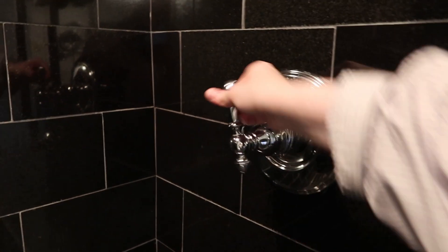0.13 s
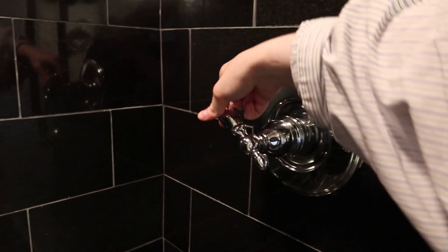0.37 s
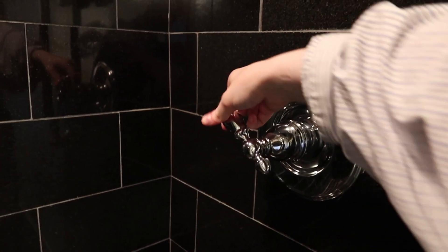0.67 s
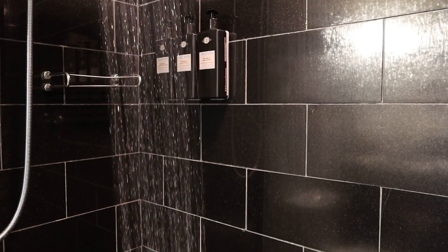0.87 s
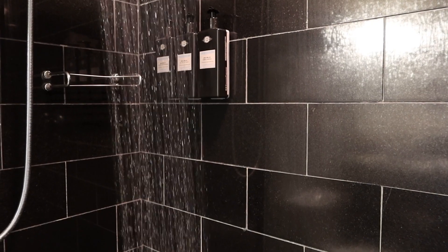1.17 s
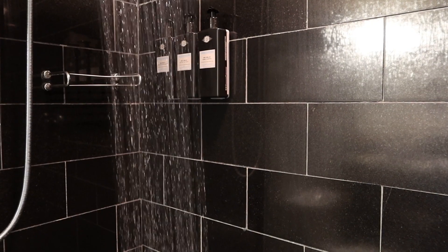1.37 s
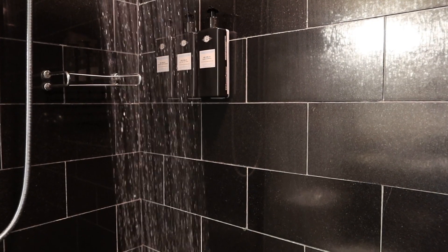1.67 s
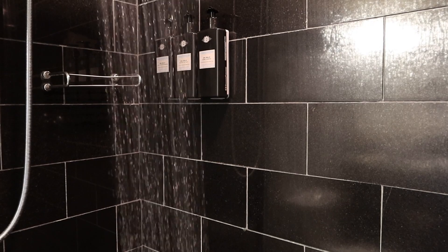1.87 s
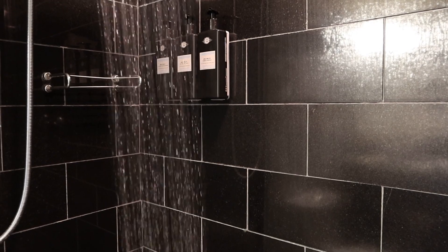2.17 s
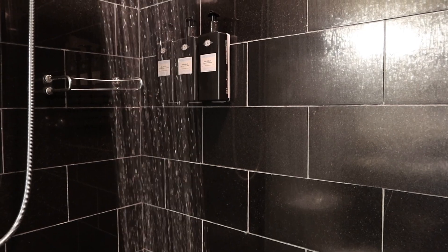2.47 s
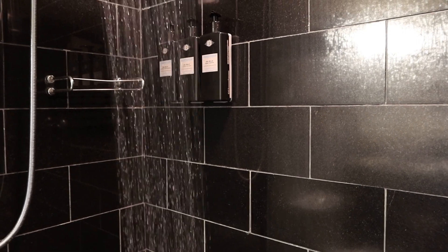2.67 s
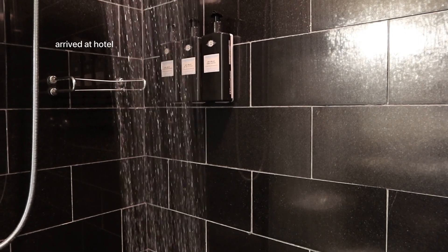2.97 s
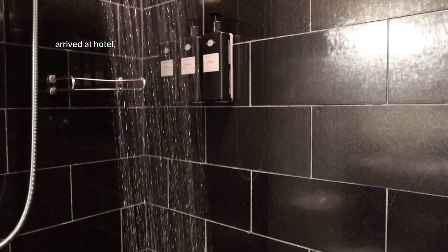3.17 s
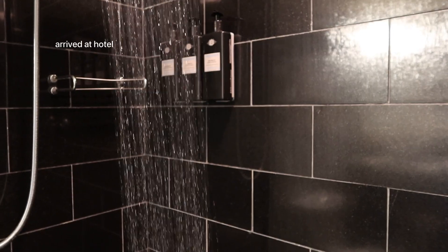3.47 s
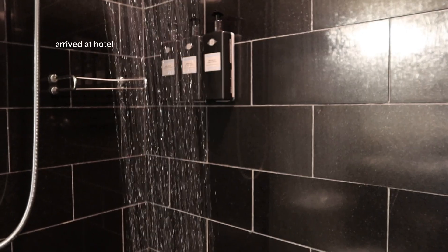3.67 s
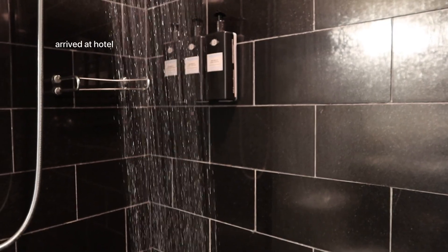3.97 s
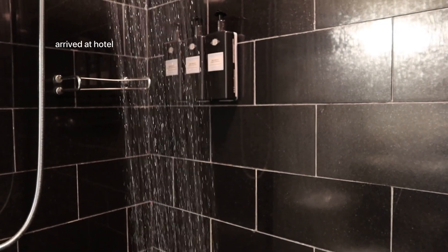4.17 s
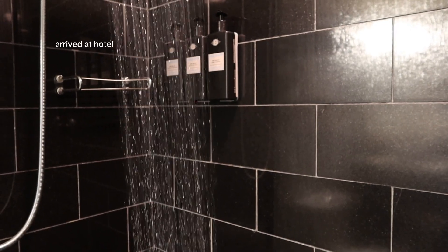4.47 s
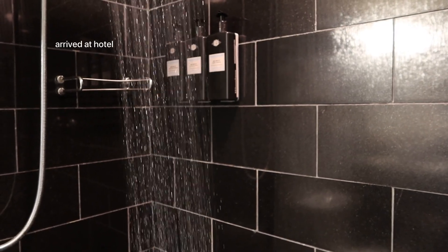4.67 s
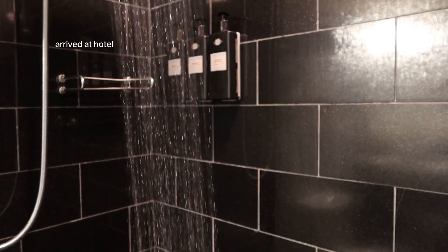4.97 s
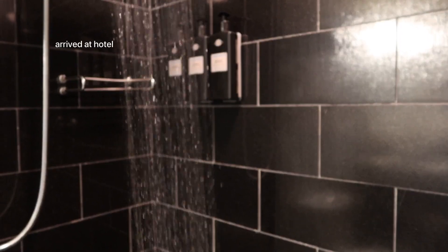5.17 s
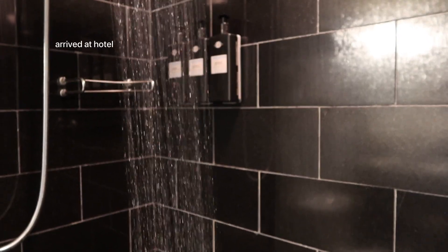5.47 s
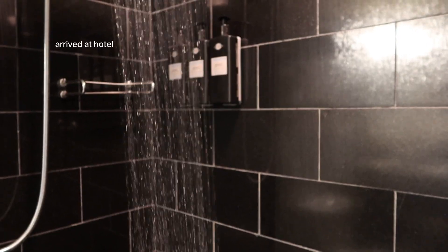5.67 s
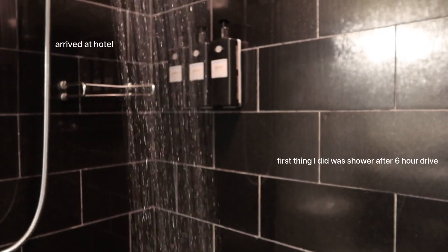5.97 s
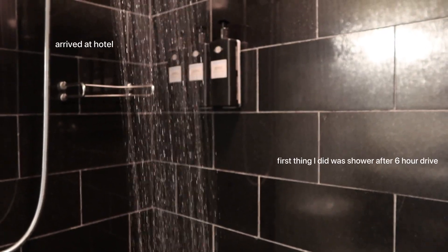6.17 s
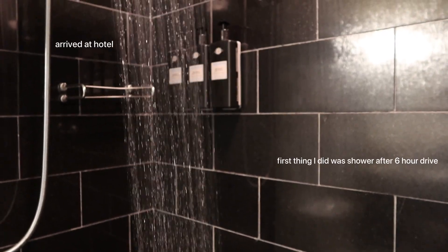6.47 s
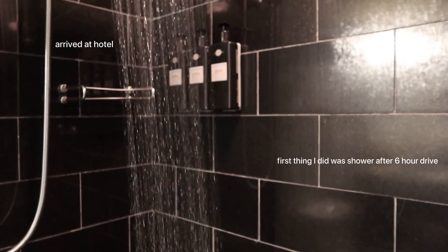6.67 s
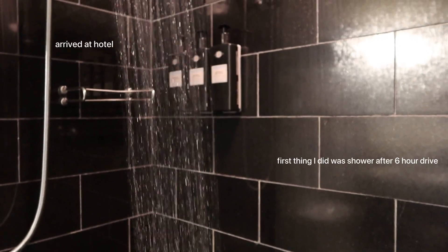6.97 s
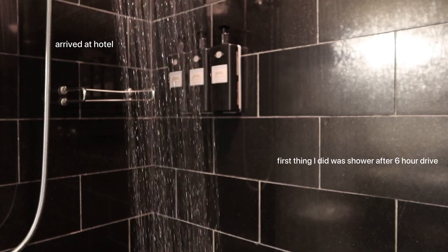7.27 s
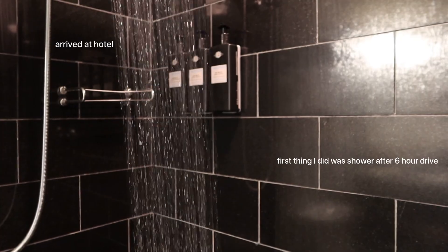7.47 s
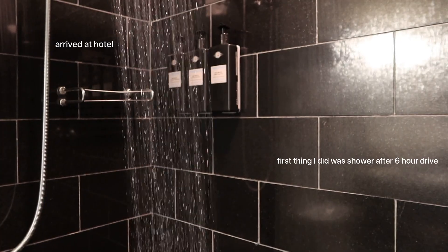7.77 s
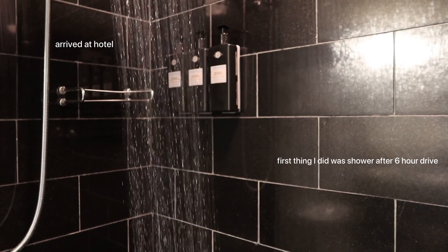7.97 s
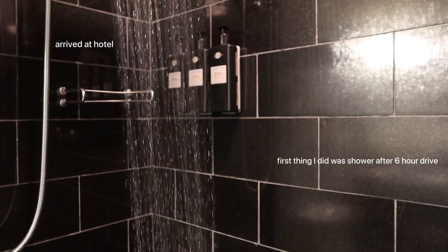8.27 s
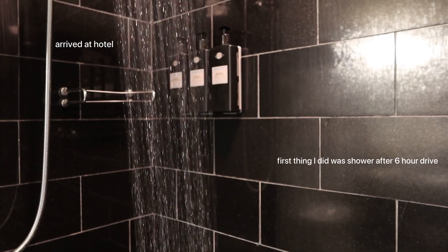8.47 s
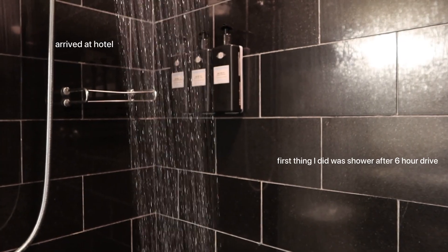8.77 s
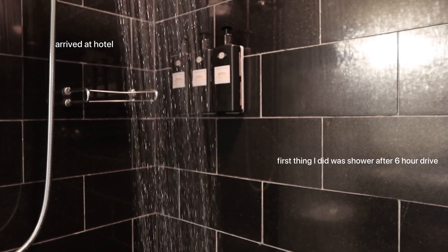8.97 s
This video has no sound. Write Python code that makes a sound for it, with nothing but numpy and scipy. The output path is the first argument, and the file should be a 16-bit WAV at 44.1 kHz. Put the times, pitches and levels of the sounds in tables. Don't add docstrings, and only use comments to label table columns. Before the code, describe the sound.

From 0 to about 0.7 s, a shower valve opens close by: a weak flow quickly swells into a pressurised rush, its jet hiss tightest around 0.2 s, with a faint fuzzy whistle near 3.7 kHz and watery pipe gurgle growing as the flow strengthens. At 0.72 s it changes abruptly to an overhead shower in a tiled stall, fading in almost instantly and running steadily to a sudden stop near 9.1 s. The spray is dense, grainy and bright, with a resonant midrange body and slight flicker. Irregular clumps slap and splash, notably around 1.9, 2.7, 4.7, 6.2 and 7.9 s; tiny drops ring briefly, and hollow plops land around 1.1, 4.1, 6.9 and 8.3 s. An extractor fan hums low and faint throughout. Close phone stereo, centred bass, wide treble, short tile echo.

```python
import sys
import numpy as np
from scipy import signal
from scipy.fft import rfft, irfft, next_fast_len
from scipy.io import wavfile
from scipy.ndimage import uniform_filter1d

SR = 44100
rng = np.random.default_rng(int(sys.argv[2]) if len(sys.argv) > 2 else 0)


def invert_db(level):
    return 10 ** (np.asarray(level, dtype=float) / 20)


def master(y):
    cut = np.clip(np.atleast_2d(y).T, -1, 1)
    pcm = np.round(cut * 32767)
    wavfile.write(sys.argv[1], SR, pcm.astype(np.int16))


N = 402191
CUT_S, END_S = .723, 9.083
HOP, FRAME = 64, 256

# (frequency [Hz], density [dB per Hz])
SPRAY = [(15, -49), (24, -21), (113, -8.5), (183, -8), (260, -4), (457, -8), (631, -12), (871, -12),
         (1300, -14.5), (3000, -18), (4600, -17.5), (6500, -20), (10000, -23.5), (13500, -24.5),
         (16000, -32.5)]
# (frequency [Hz], width [Hz], level over the wash [dB])
AIR = [(95.5, 13, 6.5), (145, 10.4, 5), (176.7, 15, 0.5), (259.6, 5.3, 11.5), (298, 6.6, 2.5),
       (385, 19, 1.5), (510, 10, 6)]
# (frequency [Hz], width [Hz], level over the spray [dB])
STALL = [(354, 22, 9), (442, 9, 12), (487, 27, 7), (570, 24, 5), (775, 30, 5), (880, 55, 10), (985, 60, 5),
         (1050, 40, 3), (1215, 60, 4), (1385, 40, 3), (1435, 25, 4), (1520, 70, 8), (1600, 70, 8.5),
         (1690, 50, 6.5), (1760, 50, 2), (2305, 70, 5), (2400, 30, 3), (2820, 110, 4), (3035, 80, 6),
         (3190, 50, 2.5), (3800, 50, 3.5), (4000, 60, 2.5), (4255, 70, 3.5), (4630, 70, 3.5),
         (4800, 90, 2.5), (5190, 90, 3.5), (5290, 50, 2.5)]
# (frequency [Hz], level [dB])
SPRAY_WIDTH = [(60, -37), (130, -23), (290, -19.5), (640, -21.5), (1410, -30), (3100, -8), (6820, -2.5),
               (11000, 3.5), (14000, 4), (16000, 13)]


def spray():
    level_db = -24.5
    wash = shaped(drops(), spray_strength)
    return invert_db(level_db) * colour(wash, SPRAY, AIR + STALL, SPRAY_WIDTH) + pings()


def drops(per_s=9000, spread_db=2.5, wet=0.73):
    size = invert_db(spread_db * np.minimum(rng.exponential(1, N), 5))
    size *= rng.random(N) < per_s / SR
    hits = size * rng.choice([-1., 1.], (2, N))
    tail_n, decay_60db_s = 4000, 0.087
    t = np.arange(tail_n) / SR
    tail = rng.standard_normal((2, tail_n)) * invert_db(-60 * t / decay_60db_s)
    blur = evened(signal.oaconvolve(hits, tail, axes=1)[:, :N])
    mist = evened(.5 * blur + rng.standard_normal((2, N)))
    return np.sqrt(1 - wet) * evened(hits) + np.sqrt(wet) * mist


# (time [s], centre [Hz], level over the spray [dB])
SLAPS = [(1.087, 1060, 12), (1.18, 970, 4), (1.347, 3090, 10), (1.921, 1760, 3), (1.982, 2600, 10.5),
         (2.656, 1100, 11.5), (2.698, 2580, 15.5), (2.728, 670, 13), (2.888, 620, 8), (3.138, 2220, 12.5),
         (3.534, 1510, 2), (4.075, 1300, 4), (4.374, 447, 2), (4.389, 2160, 11.5), (4.588, 960, 14),
         (4.686, 2000, 13), (4.743, 3960, 14), (4.995, 1760, 12), (5.7, 1210, 5), (5.846, 1290, 9),
         (6.213, 855, 13.5), (6.307, 800, 10), (6.538, 617, 12), (6.695, 2440, 9.5), (7.764, 450, 13),
         (7.943, 790, 12), (8.307, 900, 7), (8.567, 1400, 9.5), (8.84, 1000, 8), (9.024, 2360, 10),
         (.85, 860, 4), (.881, 3970, 9.5), (.988, 4980, 7), (1.621, 860, -1), (1.859, 5350, 6),
            (1.925, 2050, 14), (2.4, 2900, 9), (2.76, 2640, 10.5), (2.945, 1000, 9), (3.001, 2440, 8),
            (3.814, 1290, 11), (3.891, 860, 9), (4.223, 3040, 8), (4.912, 3920, 5), (5.13, 1410, 4),
            (4.69, 2750, 5), (5.561, 730, 8), (5.895, 3200, 8), (6.104, 3350, 10.5), (6.423, 1190, 8),
            (6.612, 2860, 7), (6.927, 2220, 9), (7.155, 1100, 8), (7.252, 670, 9), (7.446, 2820, 10),
            (7.549, 3300, 10), (7.686, 3090, 7), (8.237, 2860, 9), (8.452, 2200, 8), (8.706, 1100, 9)]
# (time [s], centre [Hz], level over the spray [dB])
MIST = [(.823, 14000, 10), (1.402, 8690, 5), (1.683, 14000, 7), (3.201, 10190, 6.5), (3.29, 10500, 5),
        (3.699, 7350, 9.5), (4.093, 11940, 5), (4.477, 14000, 8), (5.367, 3920, 9), (5.51, 12930, 6),
        (6.779, 14000, 6), (6.927, 11940, 5), (7.432, 14000, 6), (7.995, 11940, 8.5), (8.349, 7410, 10),
        (8.826, 9410, 6)]


def spray_strength(hz, t):
    body_db, fizz_db = -2.5, 1.65
    shape = (len(hz), len(t))
    high = hz ** 2 / (hz ** 2 + 2500 ** 2)
    above_fan = hz ** 2 / (hz ** 2 + 350 ** 2)
    patches_db = 1.18 * drift(shape, 7, 22) + 0.88 * drift(shape, 40, 25)
    flicker_db = 0.28 * drift((1, len(t)), 1, 30)
    db = (1 - high) * body_db + high * fizz_db + above_fan * (patches_db + flicker_db)

    power = np.ones(shape)
    for at, centre_hz, over_db in SLAPS + MIST + light_slaps():
        log_width = .15 + (.42 - .15) / (1 + (7000 / centre_hz) ** 6)
        rise_s = 0.0017 + 5.6 / centre_hz
        near = slice(*np.searchsorted(t, [at - .05, at + 0.16]))
        lag = t[near] - at + 0.0057
        rise = np.exp(-(lag / rise_s) ** 2)
        fall = .7 * np.exp(-lag / .01) + .3 * np.exp(-lag / .045)
        envelope = np.where(lag < 0, rise, fall)
        band = np.exp(-(np.log((hz + 1) / centre_hz) / log_width) ** 2)
        power[:, near] += 0.76 * (invert_db(over_db) ** 2 - 1) * band * envelope
    return invert_db(db) * np.sqrt(np.abs(power))


def light_slaps():
    count, low_hz, high_hz = 36, 450, 9000
    level_db, spread_db = 3.5, 1.5
    when, pitch, size = rng.random((count, 3)).T
    at = CUT_S + (END_S - CUT_S) * (np.arange(count) + when) / count
    hz = low_hz * (high_hz / low_hz) ** pitch
    return list(zip(at, hz, level_db + spread_db * (2 * size - 1)))


# (time [s], frequency [Hz], peak [dB])
PINGS = [(0.88, 3790, -27.7), (1.979, 2800, -30), (3.001, 2330, -30), (1.914, 1570, -25),
         (1.928, 1640, -23.9), (1.949, 1720, -26.7), (2.013, 1590, -28), (2.4, 2890, -27.7),
         (2.693, 4310, -28), (2.696, 2280, -23.1), (2.699, 2840, -25.2), (2.73, 720, -25),
         (3.532, 1550, -27), (4.061, 1510, -24), (4.388, 2280, -27.2), (4.684, 1600, -28),
         (4.685, 2200, -27), (4.74, 4220, -22.6), (4.761, 3960, -28), (5.128, 1590, -27.1),
         (5.154, 1640, -27.2), (5.366, 4260, -28), (5.9, 3060, -28), (6.877, 1550, -26.9),
         (6.925, 2280, -25.4), (6.688, 2330, -29), (7.689, 3010, -29), (8.377, 2330, -27.6),
         (8.523, 1770, -28), (8.566, 1510, -25.1)]
# (time [s], peak [dB])
LOW_PINGS = [(.852, -31), (.972, -26.5), (1.088, -20), (1.185, -26), (1.622, -25), (2.945, -28), (4.095, -24),
             (4.587, -27), (5.564, -25.5), (6.926, -23), (7.943, -33), (8.306, -18), (8.886, -20)]


def pings(rise_s=.002, ring_s=.008, split=.04, trim_db=-2.5, echo_db=-3):
    low_mode_hz = 866
    out = np.zeros((2, N))
    t = np.arange(3000) / SR
    envelope = (1 - np.exp(-t / rise_s)) * np.exp(-t / ring_s)
    envelope /= envelope.max()
    rows = PINGS + [(s, low_mode_hz, db) for s, db in LOW_PINGS] + small_pings()
    chance = rng.uniform(-1.26, 1, (len(rows), 3))
    for (at, hz, db), (turn, step, side) in zip(rows, chance):
        neighbour_hz = hz * (1 + split * step)
        pair = np.sin(2 * np.pi * hz * t) + np.sin(2 * np.pi * neighbour_hz * t + turn)
        lag = 1.6 * side * np.array([[1], [-1]]) * hz / SR
        note = np.real(signal.hilbert(pair) * np.exp(1j * np.pi * lag))
        note *= envelope * invert_db(db + trim_db)
        start = round((at - .004) * SR)
        out[:, start:start + len(t)] += note[:, :N - start]

    decay_60db_s, gap_s = 0.11, .006
    t = np.arange(8000) / SR
    mid, side = rng.standard_normal((2, len(t))) * invert_db(-60 * t / decay_60db_s) * (t > gap_s)
    echoes = np.array([mid + 0.12 * side, mid - 0.074 * side]) / np.linalg.norm(mid)
    return out + invert_db(echo_db) * signal.oaconvolve(out, echoes, axes=1)[:, :N]


def small_pings():
    count, peak_db = 24, -34
    when, pick = rng.random((count, 2)).T
    upper_hz = np.array(STALL)[15:, 0]
    at = CUT_S + (END_S - CUT_S) * (np.arange(count) + when) / count
    chosen = (pick ** 2 * len(upper_hz)).astype(int)
    return [(s, hz, peak_db) for s, hz in zip(at, upper_hz[chosen])]


# (time [s], level of water and fan together [dB], squeeze at the seat [0-1])
VALVE = [
    (0, -8, .7),
    (.05, -1.5, 0),
    (.12, -3, 0.84),
    (.2, -1.5, 1),
    (.28, -1, 0.81),
    (.45, 1.3, .5),
    (.62, 0.8, 0.7),
    (.73, 1.5, 0.5),
]
# (frequency [Hz], density [dB per Hz])
FLOW = [(15, -44), (25, -21), (122, -5.5), (178, -6), (233, -6.5), (666, -8.5), (1270, -12.5),
        (1950, -14.5), (5000, -23), (9300, -28), (11000, -37), (12400, -49), (13500, -31), (16000, -52)]
# (frequency [Hz], width [Hz], level over the hiss [dB])
GURGLE = [(1007, 30, 11), (1070, 45, 12), (1204, 34, 9.5), (1275, 19, 16.5), (1436, 34, 11.5),
          (1510, 50, 7)]
# (frequency [Hz], width [Hz], level over the hiss [dB])
PIPE = [(1610, 173, 6.5), (2440, 50, 9.5), (3750, 140, 1), (4737, 520, 10), (5230, 130, 13.5),
        (6500, 190, 9.5), (7900, 83, 8), (8200, 50, 12), (9000, 79, 7), (9345, 469, 5.5), (9948, 110, 2),
        (10500, 117, 5.9), (11369, 71, 7.6), (11500, 357, 14)]
# (frequency [Hz], level [dB])
VALVE_WIDTH = [(60, -34), (130, -30), (290, -18), (640, -23), (1410, -20), (3100, -6), (6820, -1.5),
               (11000, 5), (16000, 8)]


def valve():
    n = SR
    loudness_db, whistle_hz, bend_range_hz = -27.5, 3670, 50.4
    s, gain_db, squeeze = np.transpose(VALVE)
    jet_db = -12 + 15.5 * squeeze
    gurgle_db = 6 - 12 * np.exp(-s / .2)
    whistle_db = -33 - 23 * (1 - squeeze ** 2.7)

    def opening(hz, t):
        jet = hz ** 4 / (hz ** 4 + 4000 ** 4)
        knock = np.exp(-(np.log((hz + 1) / 1250) / 0.16) ** 2)
        db = np.interp(t, s, gain_db)
        db = db + jet * np.interp(t, s, jet_db) + knock * np.interp(t, s, gurgle_db)
        return invert_db(db + .5 * drift((len(hz), len(t)), 5, 15))

    modes = AIR + STALL[:4] + GURGLE + PIPE
    rush = shaped(rng.standard_normal((2, n)), opening)
    flow = invert_db(loudness_db) * colour(rush, FLOW, modes, VALVE_WIDTH)

    t = np.arange(n) / SR
    band = signal.butter(2, [whistle_hz - 65, whistle_hz + 55], "band", fs=SR, output="sos")
    mid, side = signal.sosfilt(band, rng.standard_normal((2, n)))
    fuzz = evened(mid + 0.61 * side * [[1], [-1]])
    bend_hz = bend_range_hz * (np.interp(t, s, squeeze) - 1)
    core = 1.1 * np.sin(2 * np.pi * np.cumsum(whistle_hz + bend_hz) / SR)
    whistle = evened(core + fuzz) * invert_db(np.interp(t, s, whistle_db))
    return np.pad(flow + whistle, ((0, 0), (0, N - n)))


# (frequency [Hz], rms by the valve [dB], rms by the spray [dB])
HUM = [(37, -49, -49.5), (75.5, -62, -68), (120.5, -39.5, -41.5), (240.2, -36, -31.5), (360, -61, -53),
       (445.3, -42, -40.5), (476, -47, -47.5), (518, -45.5, -47)]


def fan(column):
    shaft_hz, shaft_db = 58.4, (-50, -43)[column]
    hold_s, fade_db_per_s = 2.5, 2
    t = np.arange(N) / SR
    slow = t[::HOP]
    fading_db = shaft_db - fade_db_per_s * np.maximum(t - hold_s, 0)
    out = invert_db(fading_db) * np.sin(2 * np.pi * shaft_hz * t)
    for hz, *db in HUM:
        rates_hz = np.geomspace(.3, 4, 8)
        waver = sum(np.sin(2 * np.pi * (f * slow + rng.random())) for f in rates_hz)
        level = np.interp(t, slow, invert_db(db[column] + 0.56 * waver))
        out += level * np.sin(2 * np.pi * (hz * t + rng.random()))
    return np.sqrt(2) * out


# (frequency [Hz], width [Hz], level [dB])
GAPS = [(66, 10.5, -10), (134.6, 10, -14), (1000, 35, -1), (1290, 57, -2), (1660, 20, -14), (2435, 17, -7)]


def colour(pair, spectrum, modes, wide, ripple_db=1.0):
    n = next_fast_len(pair.shape[1])
    hz = np.arange(0, SR / 2, 1.)
    grid = hz[::12]
    ripple = np.array([np.interp(hz, grid, row) for row in rng.standard_normal((2, len(grid)))])
    ripple *= ripple_db * hz ** 2 / (hz ** 2 + 600 ** 2) / (1 + hz / 2500)
    gaps = np.prod([humps([gap], hz) for gap in GAPS], axis=0)
    gain = invert_db(read(spectrum, hz) + ripple) * np.sqrt(humps(modes, hz) * gaps)
    gain[1] *= invert_db(read(wide, hz))
    bins_hz = np.fft.rfftfreq(n, 1 / SR)
    gain = np.array([np.interp(bins_hz, hz, row) for row in gain])
    mid, side = irfft(rfft(pair, n) * gain, n)[:, :pair.shape[1]]
    return np.array([mid + side, mid - side]) / np.std(mid)


def humps(modes, hz):
    gain = np.ones(len(hz))
    for f, width, db in modes:
        gain += (invert_db(db) ** 2 - 1) / (1 + (2 * (hz - f) / width) ** 2) ** 2
    return np.maximum(gain, .02)


def read(points, hz):
    f, value = np.transpose(points)
    return np.interp(np.log(hz + 1), np.log(f + 1), value)


def shaped(pair, rule):
    hz, t, z = signal.stft(pair, SR, nperseg=FRAME, noverlap=FRAME - HOP)
    z = z * rule(hz[:, None], t)
    return signal.istft(z, SR, nperseg=FRAME, noverlap=FRAME - HOP)[1][:, :pair.shape[1]]


def drift(shape, bins, frames):
    field = uniform_filter1d(rng.standard_normal(shape), bins, axis=0)
    field = uniform_filter1d(field, frames, axis=1)
    return evened(uniform_filter1d(field, frames, axis=1))


def evened(x):
    return x / np.sqrt(np.mean(x ** 2) + 1e-20)


def scene():
    fade_s, offset = .022, .0004
    t = np.arange(N) / SR
    s, loudness_db, _ = np.transpose(VALVE)
    near = valve() + fan(column=0) * invert_db(np.interp(t, s, loudness_db))
    fade = np.clip((t - CUT_S) / fade_s, 0, 1) ** 1.07
    far = (spray() + fan(column=1)) * fade
    return (near * (t < CUT_S) + far + offset) * (t < END_S)


def top_cut(x):
    return signal.sosfilt(signal.butter(12, 15810, fs=SR, output="sos"), x)


def record(dry):
    return top_cut(dry)


dry = scene()
out = record(dry)
master(out)
```